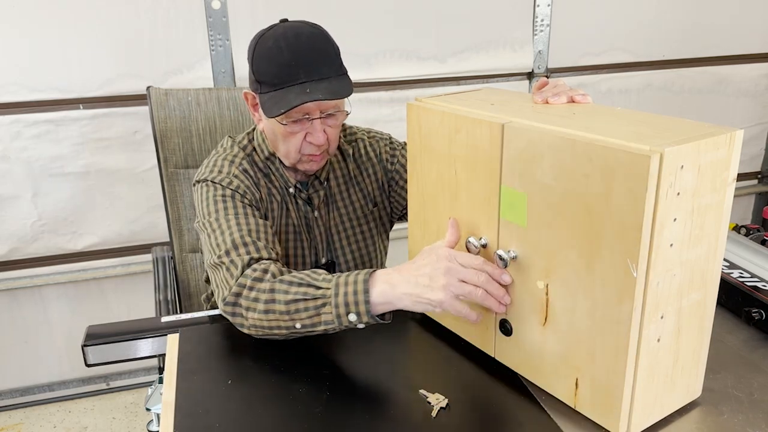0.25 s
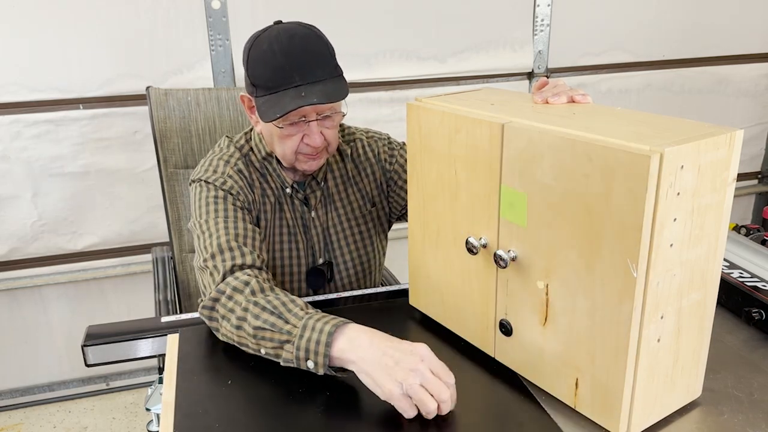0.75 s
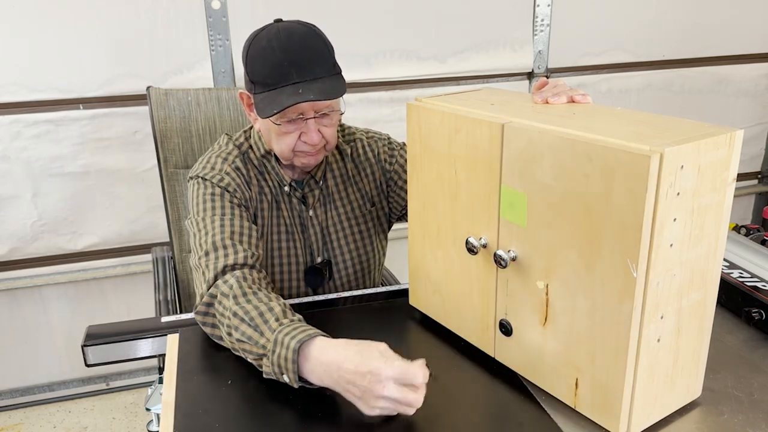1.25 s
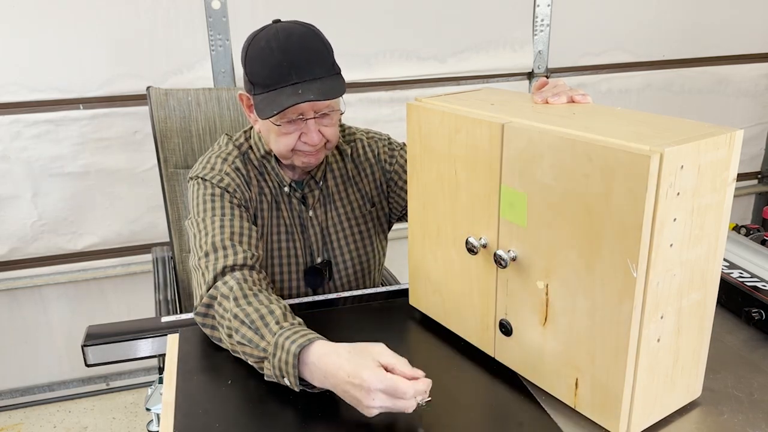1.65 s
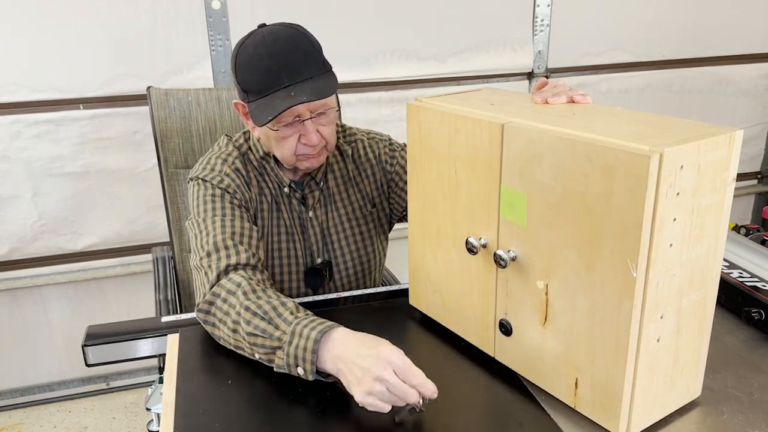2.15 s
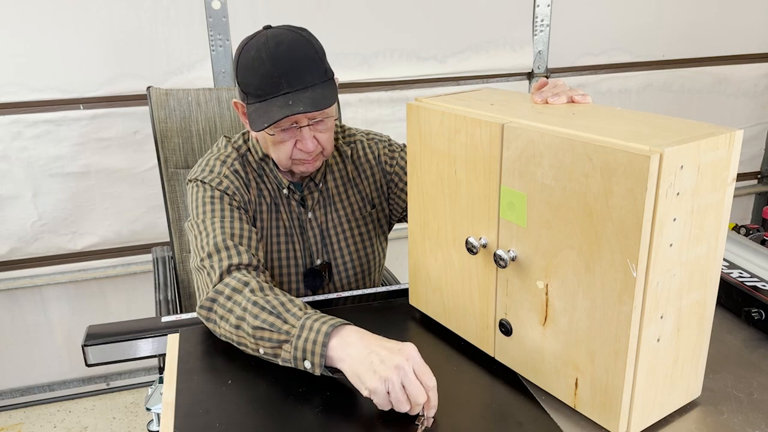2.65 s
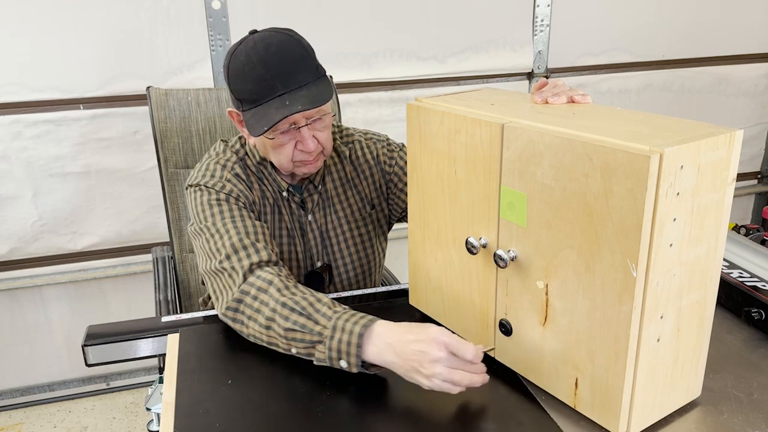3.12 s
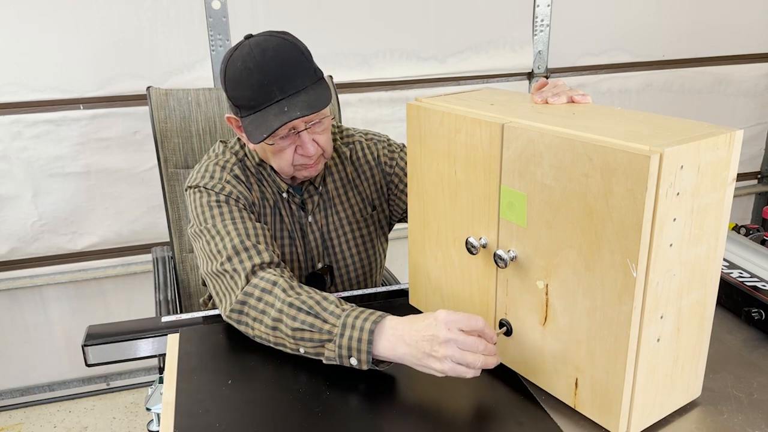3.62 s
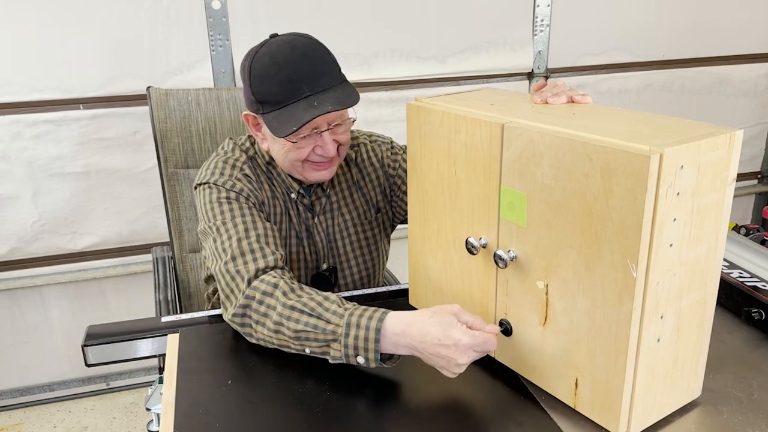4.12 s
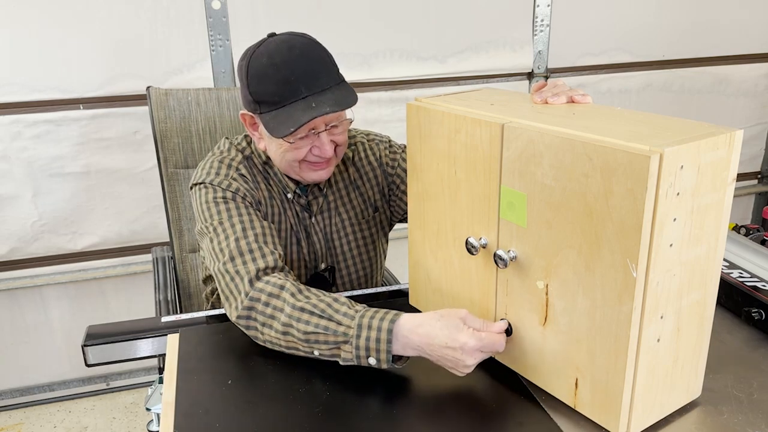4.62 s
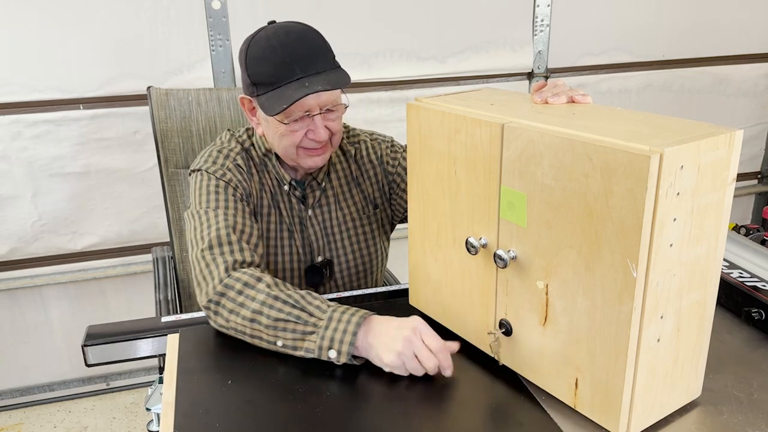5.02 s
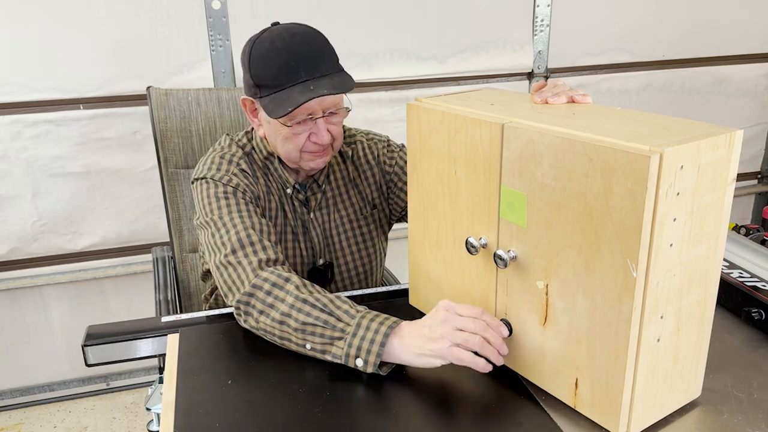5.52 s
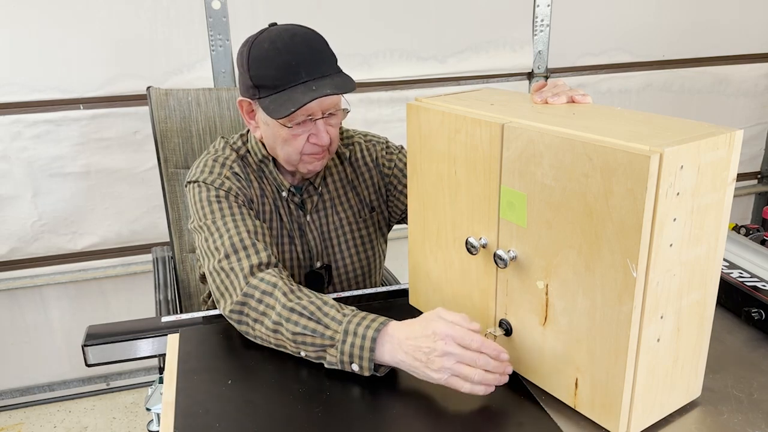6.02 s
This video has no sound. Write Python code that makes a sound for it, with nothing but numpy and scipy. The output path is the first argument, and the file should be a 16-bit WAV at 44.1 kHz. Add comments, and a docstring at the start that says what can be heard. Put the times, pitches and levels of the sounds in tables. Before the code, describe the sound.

Two wooden cabinet doors slam shut almost together with a loud, hollow boom, close to the microphone in a quiet, fairly dry workshop. A small metal key is slid across a table with brief rasps and squeaks, picked up, dropped with a light clatter and taken again. It then taps and rubs around the cabinet's lock before going in with a firm click. A shirt sleeve swishes faintly throughout.

```python
"""A quiet, fairly dry workshop. Two wooden cabinet doors slam and boom, close enough to overload the mic.
A hand slides a small key over the table, rasping and chirping, picks it up, drops it and takes it again.
Then the key is fumbled against the cabinet's lock, where it clicks and knocks. A shirt sleeve swishes as
the arm moves. Each knock is a crack, ringing modes and a short room tail; each scrape is a stream of
tiny slips shaking the wood."""
import sys
import numpy as np
from scipy import signal
from scipy.fft import rfft, irfft, next_fast_len
from scipy.io import wavfile
from scipy.ndimage import map_coordinates

SR = 44100
rng = np.random.default_rng(int(sys.argv[2]) if len(sys.argv) > 2 else 0)


def transcribe(signal):
    """Save signal, clipped to [-1, 1], as a 16-bit WAV file at the path in sys.argv[1]."""
    frames = np.atleast_2d(signal).T
    limited = np.clip(frames, -1, 1)
    pcm = np.round(limited * 32767).astype(np.int16)
    wavfile.write(sys.argv[1], SR, pcm)


N = 276507
CLOCK = np.arange(N) / SR  # scene time [s]
T = np.arange(int(.7 * SR)) / SR  # time within a one-shot [s]

# Hit cues: (time [s], bass level [dB], treble over bass [dB], contact [s])
DOOR_HITS = [(0.0, -3.5, -5.5, 0.0013), (.0095, -8, -9.5, 0.004), (.027, -3.5, -13.5, 0.0049),
             (.043, -20.5, -6.5, 0.0035), (.343, -47, -50, 0.0028)]  # doors strike the frame, rebound and settle
TABLE_HITS = [(.733, -34, -11.5, .002), (.761, -28, -8.5, .0036), (.7815, -45, 8, 0.00064),
              (.803, -39.5, -9, 0.0032), (.935, -35, 9.5, .008), (1.129, -41, -4.5, .0009),
              (1.4925, -39, -12, 0.00085), (1.555, -30.5, -16.5, 0.00064), (1.6062, -37, -22, 0.00023),
              (2.1948, -21, -4.5, 0.00034), (2.2397, -19.5, -7.5, 0.00075), (2.2528, -15, -9.5, .0005),
              (2.2603, -23.5, 4.5, 0.0011), (2.2895, -22, -12, 0.00079), (2.3703, -30, -6.5, 0.00029),
              (2.3912, -38, 2, 0.00062), (2.4085, -33, 3, 0.00061), (2.4205, -34, 0.5, 0.0057),
              (2.431, -36, -12, 0.00412), (2.7555, -39.5, 1.5, 0.00108), (2.851, -42, -2, 0.00067)]  # key on the table top
PANEL_HITS = [(3.551, -39.5, -10, .004), (3.613, -42, -17.5, .004), (3.7435, -31.5, -20.5, 0.0024),
              (3.9695, -37, -19, .0014), (4.005, -34.5, -17.5, .008), (4.2025, -32.5, -22, 0.0027),
              (4.215, -28, -18, 0.0023), (4.3395, -29, -26, .0012), (4.37, -25.5, -18.5, .007),
              (4.382, -21.5, -15, .011), (4.408, -21.5, -10.5, .002), (4.525, -39.5, -13, .0034),
              (4.553, -38, -48, .003), (4.686, -36.5, -16, .0036), (4.742, -48.5, -13, .006),
              (4.864, -36, -44, .005)]  # key and knuckles miss the keyhole
BARREL_HITS = [(5.445, -36, -17.5, 0.0032), (5.508, -36.5, -21, 0.013), (5.5845, -27, 1, 0.0024),
               (5.588, -15.5, -19.5, 0.0016), (5.8365, -47, 2.5, 0.00081), (5.855, -41, -17, 0.0063),
               (5.868, -38, -13, 0.0031), (5.903, -48, -13.5, 0.01), (6.1075, -54, -6.5, .003),
               (6.2345, -51, -21, 0.0032)]  # key enters, jams home and is jiggled
# Slide cues: (start [s], length [s], level [dB])
SLEEVE_STROKES = [(.35, .17, -53.5), (1.0, 0.37, -58.5), (2.91, .295, -50), (3.3, 0.14, -60),
                  (3.6, 0.26, -67), (4.17, 0.18, -58), (4.51, 0.063, -51.5), (4.67, 0.11, -52.5),
                  (4.88, .2, -46.5), (5.31, 0.23, -48.5), (5.85, 0.31, -59.5)]  # one per move of the arm
PALM_STROKES = [(.665, 0.088, -44.5), (.82, 0.089, -36.5)]  # palm over the table
KEY_DRAGS = [(.748, 0.027, -30.5), (.80, 0.036, -36), (.895, .06, -45.5), (1.068, 0.051, -40),
             (2.272, 0.082, -28.5), (2.39, 0.046, -33.5), (2.5, .22, -40), (2.572, 0.028, -28),
             (2.81, 0.02, -36.5)]  # key over the table
LOCK_RUBS = [(3.82, 0.025, -53.5), (3.98, 0.024, -39.5), (4.2, .04, -43.5), (4.44, 0.15, -48),
             (4.7, 0.16, -46), (4.88, 0.086, -41), (5.28, 0.42, -58), (5.92, 0.41, -55)]  # fingers and key feel over the lock
# Dull low thuds in the table, from the hand and later the cabinet bumping on it: (time [s], gain [dB])
TABLE_THUDS = [(0.606, -43.5), (.661, -40.5), (0.894, -38), (1.289, -36.5), (2.429, -38.5), (2.631, -42),
               (2.731, -42.5), (4.371, -30), (4.402, -31), (4.744, -39), (4.866, -40)]
# The dragged key catches: (time [s], length [s], start pitch [Hz], end pitch [Hz], level [dB])
KEY_CHIRPS = [(.742, 0.016, 1260, 1060, -26.5), (.743, 0.022, 5800, 5800, -26.5),
              (0.761, 0.02, 3750, 3980, -37), (0.764, 0.0482, 862, 546, -25),
              (0.791, 0.02, 4770, 5000, -34), (0.924, 0.04, 1200, 990, -29.5),
              (1.061, 0.015, 1880, 1500, -38), (2.575, .05, 2400, 2120, -31.5),
              (2.677, 0.044, 2330, 1930, -43.5)]
# The key rings: (time [s], gain [dB], share of free ring time left by the grip [0-1])
KEY_CLINKS = [(.745, -38, 0.27), (.939, -42, .25), (1.072, -52.5, 0.61), (1.1535, -36, .75),
              (1.996, -60.5, .4), (2.195, -39.5, .45), (2.293, -48.5, 0.28), (2.371, -49.5, .5),
              (2.408, -44.5, 0.5), (2.757, -46.5, 0.65), (2.801, -51, .55), (2.846, -47.5, .4),
              (2.916, -38, 0.1), (4.686, -57, 0.37), (5.502, -51, .45), (5.607, -39, .22)]

# Resonances of each body: (frequency [Hz], relative level [dB], t60 [s])
CABINET_MODES = [(106, -36, 0.53), (178, -42, .8), (200.5, -13, 0.098), (226.7, -12.5, .2),
                 (256, -12.5, 0.3), (285.6, -6, 0.25), (302, -39, 1), (348, -13, 0.37), (389.6, 0.5, 0.084),
                 (515, -20, 0.093), (601.4, -6.5, 0.21), (707, -14, 0.14), (1006, -25.5, 0.089),
                 (1150, -18.5, 0.13), (1315, -23, .11)]
TABLE_LOW_MODES = [(109.55, -3.5, 0.63), (174, 0, 0.0927), (280, 10, 0.089), (368, 8, 0.024),
                   (570, -2.5, 0.055), (670, -4.5, 0.045)]
TABLE_MODES = [(105.7, -19.5, 0.36), (260, -18.5, 0.28), (296.8, -14.5, 0.28), (522.4, -1.5, 0.054),
               (660, -6, 0.066), (708, -2.5, 0.1), (847, -17, 0.15), (1046, -4.5, 0.059), (1360, -9, .11),
               (1860, -15, 0.14), (2123, -14, 0.11), (2460, -20.5, 0.12), (2750, -8.5, 0.064),
               (3820, -13, 0.11), (4727, -10, 0.1)]
KEY_BEND_MODES = [(3800, -11, 0.18), (8230, -11, 0.33)]
KEY_TWIST_MODES = [(10340, 2.5, 0.19), (10400, -24, .12), (10670, -7.5, .13), (10990, -1, 0.23),
                   (15520, -11.5, 0.14)]
PANEL_MODES = [(77.7, -15.5, 0.19), (203, -9, 0.089), (233.3, -1.5, 0.11), (291, -3.5, 0.29),
               (331, -14, 0.37), (361.8, 0.5, 0.23), (450, -25.5, 0.076), (545, 4, 0.14), (575.8, 5, 0.11),
               (692, -7, 0.15), (984, -8.5, 0.11), (1328, -6, 0.1015), (2533, -11, 0.063)]
BARREL_MODES = [(366, -4, 0.26), (425, 5.5, 0.035), (525, -6.5, 0.07), (597, -2, 0.1), (675, 3.5, 0.1),
                (740, -6, 0.15), (1027, -9, 0.098), (1314, -12.5, 0.13), (1984, -29, 0.18),
                (2370, -10, 0.038)]
# EQ standing for each body's crowd of short-lived modes: (frequency [Hz], gain [dB])
CABINET_EQ = [(25, -15.5), (70, -7), (140, -7.5), (280, 5), (700, -4), (1300, -3), (2000, -8.5), (3200, -4),
              (5500, -8), (8000, -28), (16000, -30.5)]
TABLE_EQ = [(25, -32.5), (90, -36), (170, -9), (300, 11), (440, -3.5), (680, 9.5), (900, -10.5), (1400, -1),
            (1700, -6), (3000, -7), (4800, -12.5), (6800, -18.5), (8500, -33), (16000, -33.5)]
LOCK_EQ = [(25, -43.5), (120, -9.5), (200, -5), (330, 9.5), (600, 3), (850, -4), (1350, -6.5), (1750, -12),
           (2800, -11.5), (4600, -18.5), (7000, -25), (9000, -33), (16000, -37.5)]
# EQ of the noise textures: (frequency [Hz], gain [dB])
AIR_EQ = [(25, -10), (55, -10), (120, -3), (230, -5), (400, -6.5), (850, -16.5), (1500, -19), (3800, -21),
          (6000, -20), (8000, -25.5), (16000, -33)]
CLOTH_EQ = [(200, -4.5), (600, 4), (1400, -2), (3500, -2), (7000, -4), (10000, -10), (13000, -16.5),
            (16000, -18.5)]
PALM_EQ = [(25, -26), (110, -20), (300, -0.5), (700, -1), (1300, -15), (4000, -26), (16000, -50)]
DRAG_EQ = [(25, -58), (120, -19), (300, -1.5), (700, 3), (1400, 0.5), (2600, -6), (4000, -8.5),
           (5500, -16.5), (8500, -30), (16000, -37)]  # metal rasping on the table top
# Reverb time of the workshop: (frequency [Hz], t60 [s])
ROOM_DECAY = [(100, 0.37), (300, 0.31), (1000, 0.22), (4000, 0.17), (8000, 0.25), (15000, .13)]
# Bass, mid and treble of a hit; the bass is only low-passed: (low edge [Hz], high edge [Hz])
HIT_BANDS = [(60, 800), (800, 3500), (3500, 16000)]


def amp(db):
    """Decibels to gain."""
    return 10 ** (np.asarray(db) / 20)


def rms(x):
    """Root mean square."""
    return np.sqrt(np.mean(x ** 2) + 1e-20)


def curve(points, hz):
    """Read a breakpoint curve on a log frequency axis."""
    point_hz, values = np.transpose(points)
    return np.interp(np.log(hz + 1), np.log(point_hz), values)


def equalise(x, eq):
    """Minimum-phase EQ: nothing rings ahead of a transient."""
    size = 2 * next_fast_len(len(x) // 2 + 2048)
    gain = amp(curve(eq, np.fft.rfftfreq(size, 1 / SR)))
    cepstrum = irfft(np.log(gain), size)
    cepstrum[1:size // 2] *= 2
    cepstrum[size // 2 + 1:] = 0
    return irfft(rfft(x, size) * np.exp(rfft(cepstrum)), size)[:len(x)]


def noise(eq):
    """A steady noise bed at rms 1."""
    bed = equalise(rng.standard_normal(N), eq)
    return bed / rms(bed)


def ring(modes, scatter_db):
    """Damped modes, struck with a new balance each time."""
    hz, db, t60 = np.transpose(modes)[:, :, None]
    db = db + scatter_db * rng.standard_normal(hz.shape)
    polarity = (-1) ** np.arange(len(hz))[:, None]
    return np.sum(polarity * amp(db - 60 * T / t60) * np.sin(2 * np.pi * hz * T), axis=0)


def room_tail():
    """Diffuse reverb in which each frequency dies at its own speed."""
    hz, t, spectrum = signal.stft(rng.standard_normal(len(T)), SR, nperseg=256)
    decay = amp(-60 * t / curve(ROOM_DECAY, hz)[:, None])
    return signal.istft(spectrum * decay, SR, nperseg=256)[1][:len(T)]


def hits(cues, modes, eq, crack_t60, ring_db, room_db, mid_db):
    """Each contact layers crack, ring and room tail; its attack is levelled in three bands."""
    track = np.zeros(N)
    filters = [signal.butter(3, HIT_BANDS[0][1], fs=SR, output='sos')]
    filters += [signal.butter(3, edges, 'bandpass', fs=SR, output='sos') for edges in HIT_BANDS[1:]]
    for s, db, treble_db, contact in cues:
        force = np.minimum(T / contact, 1)
        release = amp(-60 * np.maximum(T - contact, 0) / crack_t60)
        crack = rng.standard_normal(len(T)) * np.sqrt(force) * release
        send = amp(room_db) * np.sqrt(contact / .0002)  # a longer contact feeds the room more energy
        tail = send * room_tail() * (1 - np.exp(-T / (contact + .004)))
        body = amp(ring_db) * force * ring(modes, scatter_db=1.2)
        hit = equalise(crack + tail, eq) + body
        attack = int((contact + .01) * SR)
        tilt_db = (0, mid_db + .28 * treble_db, treble_db)  # the mids partly follow the treble
        for sos, lift_db, polarity in zip(filters, tilt_db, (1, -1, 1)):
            band = signal.sosfilt(sos, hit)
            add(track, s, polarity * amp(db + lift_db) * band / rms(band[:attack]))
    return track


def strokes(cues, rise_db_per_s, sag_db_per_s, fall_db_per_s):
    """Envelope of sliding moves: each swells up to its start, sags while it lasts, then dies away."""
    power = np.zeros(N)
    for start, length, db in cues:
        t = CLOCK - start
        loss_db = rise_db_per_s * np.maximum(-t, 0)
        loss_db += sag_db_per_s * np.clip(t, 0, length)
        loss_db += fall_db_per_s * np.maximum(t - length, 0)
        power += amp(db - np.minimum(loss_db, 100)) ** 2
    return np.sqrt(power)


def friction(modes, eq, slips_per_s, spread_db, ring_db):
    """Tiny slips of uneven size shake a body; a steady scrape at rms 1."""
    slipping = rng.random(N) < slips_per_s / SR
    slips = slipping * rng.standard_normal(N) * amp(spread_db * rng.standard_normal(N))
    resonance = signal.fftconvolve(slips, ring(modes, scatter_db=4))[:N]
    scrape = equalise(slips, eq) + amp(ring_db) * resonance
    return scrape / rms(scrape)


def add(track, s, sound):
    """Mix a one-shot into the track at s seconds."""
    start = max(0, round(s * SR))
    track[start:start + len(sound)] += sound[:N - start]


def room_tone():
    """The faint air of the still workshop."""
    return amp(-60.5) * noise(AIR_EQ)


def doors():
    """One door lands just after the other and the whole cabinet booms."""
    return hits(DOOR_HITS, CABINET_MODES, CABINET_EQ, crack_t60=.036, ring_db=-11, room_db=-22,
                mid_db=-3.5)


def sleeve():
    """Cloth swishes with each move of the arm, with a fine flutter from its weave."""
    flutter = map_coordinates(rng.standard_normal(N // 100), [CLOCK * 60])  # 60 new values a second
    swish = strokes(SLEEVE_STROKES, rise_db_per_s=88, sag_db_per_s=4, fall_db_per_s=169.5)
    return swish * amp(1.4 * flutter) * noise(CLOTH_EQ)


def table_thuds():
    """Soft bumps from the hand, and later the cabinet, wake only the table's low modes."""
    track = np.zeros(N)
    soft_attack = 1 - np.exp(-T / .001)
    for s, db in TABLE_THUDS:
        add(track, s, amp(db) * soft_attack * ring(TABLE_LOW_MODES, scatter_db=1))
    return track


def palm():
    """The hand brushes the table dully as it covers the key."""
    pressure = strokes(PALM_STROKES, rise_db_per_s=294, sag_db_per_s=10, fall_db_per_s=250)
    return pressure * friction(TABLE_LOW_MODES, PALM_EQ, slips_per_s=1500, spread_db=0, ring_db=-48)


def key_on_table():
    """The key taps, clatters and scrapes on the table top."""
    taps = hits(TABLE_HITS, TABLE_MODES, TABLE_EQ, crack_t60=.018, ring_db=-20.5, room_db=-26, mid_db=2.5)
    pressure = strokes(KEY_DRAGS, rise_db_per_s=613, sag_db_per_s=25, fall_db_per_s=419)
    rasp = friction(TABLE_MODES, DRAG_EQ, slips_per_s=4400, spread_db=3, ring_db=-36.5)
    return taps + pressure * rasp


def key_chirps():
    """Stick and slip lock into a short, rough, gliding tone."""
    track = np.zeros(N)
    for s, length, start_hz, end_hz, db in KEY_CHIRPS:
        progress = np.minimum(T / length, 1)
        jitter = map_coordinates(rng.standard_normal(len(T)), [T * 700])  # roughens pitch and level
        hz = (start_hz + (end_hz - start_hz) * progress ** 2) * (1 + .051 * jitter)
        envelope = amp(db + 2 * jitter) * np.sin(np.pi * progress)
        add(track, s, envelope * np.sin(2 * np.pi * np.cumsum(hz) / SR))
    return track


def key_clinks(strikes=3, gap_s=.018, loss_db=6.5):
    """The key rattles on its ring; a tighter grip shortens and detunes it and stifles its bending."""
    track = np.zeros(N)
    for s, db, freedom in KEY_CLINKS:
        grip = 1 - min(freedom, 1)
        for strike in range(strikes):
            detune = 1 + .02 * grip * rng.standard_normal()
            mode_scale = [detune, 1, max(freedom, .1)]  # scales frequency, level, t60
            twist = ring(np.multiply(KEY_TWIST_MODES, mode_scale), scatter_db=3)
            bend = amp(16.5 - 33 * grip) * ring(np.multiply(KEY_BEND_MODES, mode_scale), scatter_db=1.5)
            tick = (strike == 0) * amp(4) * rng.standard_normal(len(T)) * amp(-60 * T / .015)
            add(track, s, amp(db - loss_db * strike) * (twist + bend + tick))
            s += 2 * freedom * gap_s * (.5 + rng.random())  # gap_s is the mean gap at half grip
    return track


def key_in_lock():
    """The key feels for the keyhole on the door panel, then goes into the barrel."""
    misses = hits(PANEL_HITS, PANEL_MODES, LOCK_EQ, crack_t60=.045, ring_db=-17.5, room_db=-24.5,
                  mid_db=1)
    entry = hits(BARREL_HITS, BARREL_MODES, LOCK_EQ, crack_t60=.02, ring_db=-15, room_db=-25.5, mid_db=.5)
    pressure = strokes(LOCK_RUBS, rise_db_per_s=187, sag_db_per_s=21, fall_db_per_s=85)
    rub = friction(PANEL_MODES, LOCK_EQ, slips_per_s=7200, spread_db=.5, ring_db=-49.5)
    return misses + entry + pressure * rub


def scene():
    """Mono mix of doors, key and soft handling sounds over the room tone."""
    key = key_on_table() + key_chirps() + key_clinks() + key_in_lock()
    handling = table_thuds() + palm() + sleeve()
    return (doors() + key + handling + room_tone())[None]


def record(dry):
    """The slam clips at full scale, then a brick-wall low-pass takes off the very top."""
    clipped = np.clip(dry, -1, 1)
    size = next_fast_len(N + SR // 2)
    passband = np.fft.rfftfreq(size, 1 / SR) < 15850
    return irfft(rfft(clipped, size) * passband, size)[:, :N]


dry = scene()
out = record(dry)
transcribe(out)
```